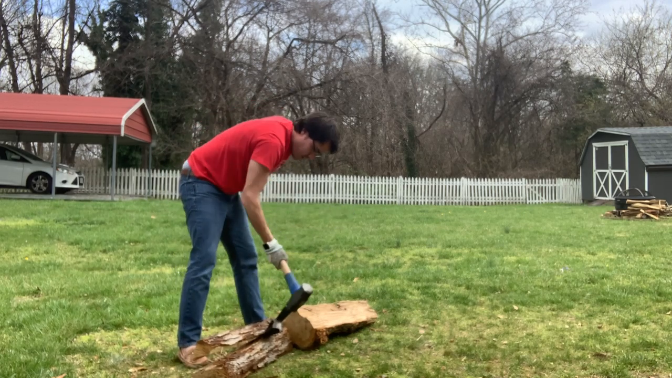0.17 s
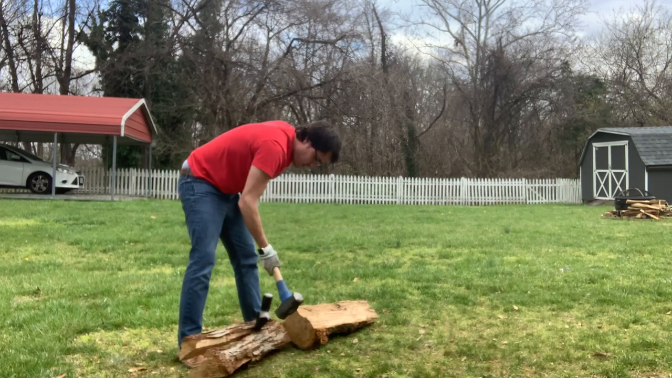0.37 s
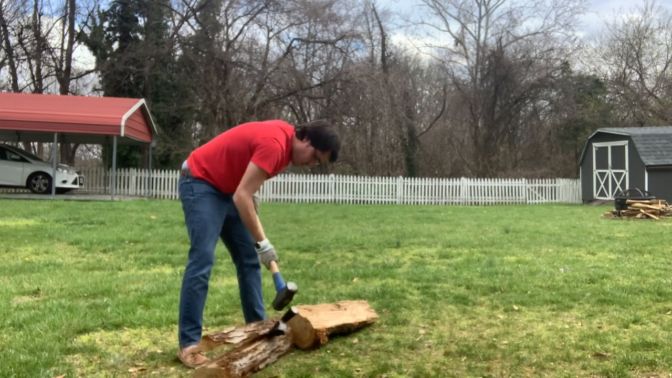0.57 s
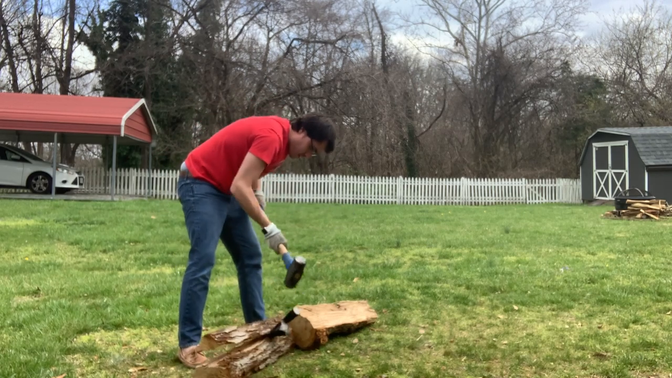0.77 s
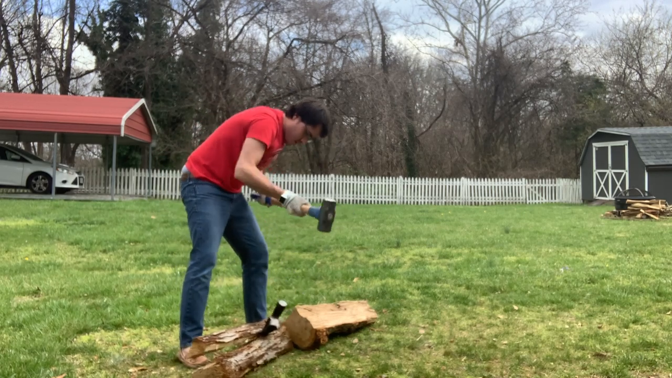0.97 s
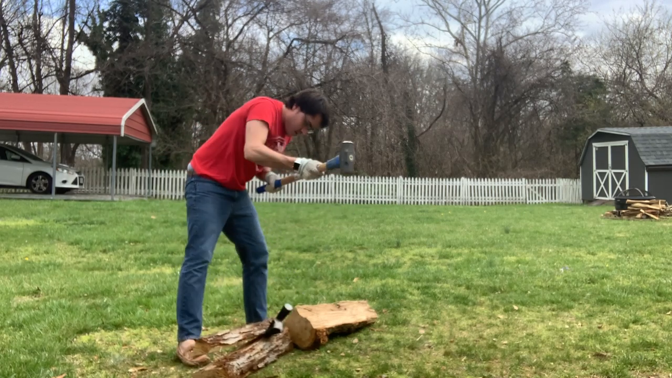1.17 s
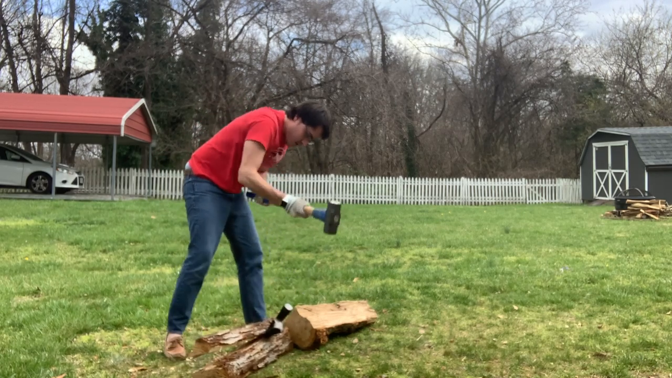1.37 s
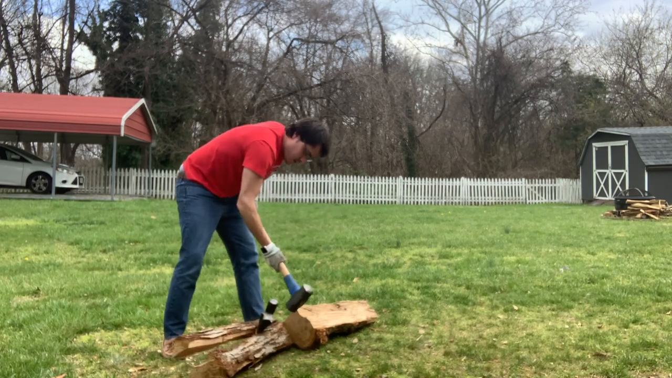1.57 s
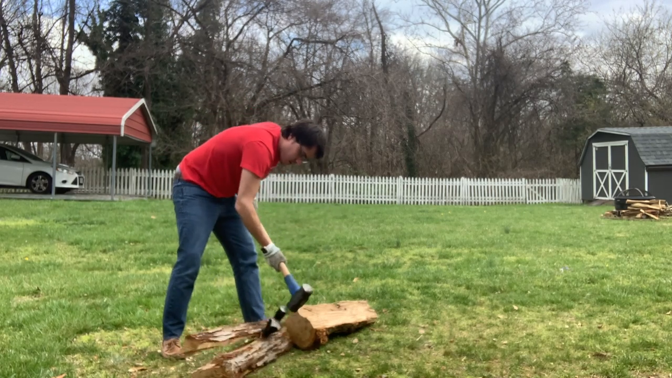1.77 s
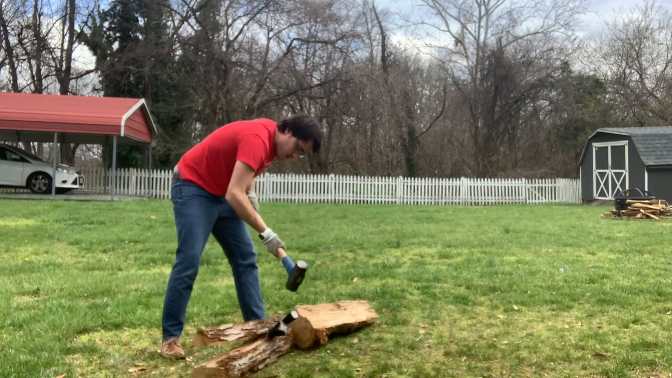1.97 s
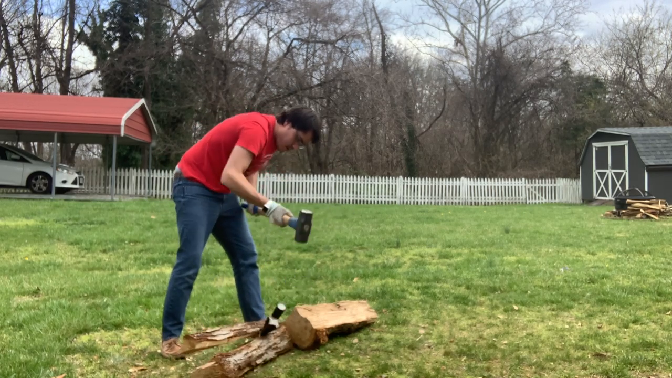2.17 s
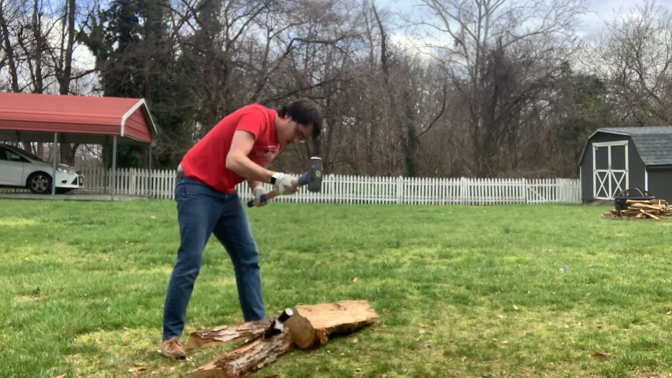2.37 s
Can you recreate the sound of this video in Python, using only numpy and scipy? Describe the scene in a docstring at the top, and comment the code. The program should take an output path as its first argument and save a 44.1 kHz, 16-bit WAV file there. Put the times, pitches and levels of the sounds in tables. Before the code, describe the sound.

A sledgehammer hits a steel wedge in a log twice, just over a second apart, each a sharp chattering clank with wood crack, then a dull head knock; open lawn, light wind rumble, stereo microphone some distance away.

```python
"""On an open lawn in light wind, a sledgehammer twice hits a steel wedge set in a log.
Each blow is a short chatter: dying tones for the wedge, the steel and the log, and noise bursts for cracking wood.
A soft swish comes before the second blow. After each blow the head drops onto the log; low tones thump the turf.
Fading noise makes the answers of lawn, yard, buildings and trees; filtered noise makes wind and a distant hush."""
import sys
import numpy as np
from scipy import signal
from scipy.fft import rfft, irfft
from scipy.io import wavfile

SR = 44100
rng = np.random.default_rng(int(sys.argv[2]) if len(sys.argv) > 2 else 0)


def digitize_waveform(pressure):
    """Quantize a signal to 16-bit integers and store it at the path in sys.argv[1].

    Rows of a 2-D input are taken as channels; values are limited to [-1, 1].
    """
    field = np.atleast_2d(pressure).T
    bounded = np.clip(field, -1, 1)
    quanta = np.round(bounded * 32767).astype(np.int16)
    wavfile.write(sys.argv[1], SR, quanta)


N = 105840  # samples, 2.4 s
T = np.arange(N) / SR  # time in seconds

# Tone of the wind rumble. Each row: pitch in Hz, relative level per Hz in dB.
WIND_TONE = [(20, -18.5), (32, -9), (48, 5), (65, 1), (100, 3.5), (135, -6.5), (180, -12), (260, -19.5),
             (400, -43), (1000, -67.5)]
# Loudness of the wind before its gusts. Each row: time in seconds, level in dB.
WIND_LOUDNESS = [(0, -52), (.1, -55), (.15, -43.5), (.27, -69.5), (.39, -66.5), (.43, -51.5), (.51, -58),
                 (.65, -46), (.72, -55), (.83, -48.5), (1.02, -56), (1.07, -51.5), (1.25, -53),
                 (1.48, -44.5), (1.74, -55.5), (1.8, -46.5), (1.9, -55), (1.98, -49.5), (2.2, -47),
                 (2.4, -50)]
# Tone of the distant hush. Each row: pitch in Hz, relative level per Hz in dB.
HUSH_TONE = [(100, 1.5), (300, 0.5), (600, -6.5), (1200, -8.5), (2100, -10.5), (2380, -8), (2560, 0),
             (2740, -10.5), (4000, -17.5), (6000, -27), (8300, -39.5), (11000, -31), (14000, -47.5),
             (15500, -52)]
# Loudness of the hush. Each row: time in seconds, level in dB.
HUSH_LOUDNESS = [(0, -64), (.4, -63), (.9, -64), (1.3, -64.5), (1.9, -66), (2.4, -69)]
# Near scatter from the lawn. Each row: pitch in Hz, level in dB, seconds to fade by 60 dB.
LAWN_SCATTER = [(150, -7.5, 0.29), (500, -9, 0.08), (1480, -13, 0.1), (3100, -13, 0.19),
                (6000, -9.5, 0.074), (12900, -15, 0.11)]
# Wider scatter from the yard. Each row: pitch in Hz, level in dB, seconds to fade by 60 dB.
YARD_SCATTER = [(150, -21.5, .3), (500, -21.5, 0.41), (1500, -29, 0.22), (3200, -27, 0.19),
                (5500, -29, 0.27), (9500, -31, .25), (14000, -31, 0.22)]
# Brief slap from the buildings. Each row: pitch in Hz, level in dB, seconds to fade by 60 dB.
BUILDING_SLAP = [(507, -45, .12), (3000, -32.5, 0.14), (7300, -33, 0.06), (9760, -24, 0.12),
                 (13000, -37, 0.07)]
# Echo of the tree line. Each row: pitch in Hz, level in dB, seconds to fade by 60 dB.
TREE_ECHO = [(152.9, -41, 0.5), (497, -35.5, 1), (1070, -25, 0.73), (1600, -29, 1), (2256, -23, 0.45),
             (3150, -28, 0.73), (4070, -27, 0.6), (5370, -26.5, 0.82), (9100, -34, 0.6), (11600, -36, 0.19),
             (14100, -42.5, .25)]
# Tone of the hammer's swish. Each row: pitch in Hz, relative level in dB.
SWISH_TONE = [(150, -18.5), (470, 1), (700, -11.5), (1200, -13.5), (2500, -29.5), (8000, -47.5)]
# The head lightly brushes the wedge. Each row: start in seconds, level in dB, decay time in seconds,
# tilt in dB per octave.
LIGHT_TICKS = [(1.83, -59, 0.0088, 1.5)]
# The log thumps the ground. Each row: start in seconds, level in dB, pitch in Hz, seconds to fade by 60 dB.
GROUND_THUMPS = [(0.2096, -35, 114, 0.11), (0.21, -40.5, 255, 0.047), (1.5143, -28, 137, 0.071),
                 (1.514, -29.5, 238.7, 0.032), (1.5172, -28, 67.15, 0.1), (1.8338, -29, 159.5, 0.034)]
# The head drops onto the log and bounces. Each row: start in seconds, blow index, level in dB,
# most excited pitch in Hz.
HEAD_KNOCKS = [(0.5283, 0, -31.5, 2420), (0.5325, 0, -37.5, 420), (0.5368, 0, -47, 1410),
               (0.5398, 0, -44, 527), (1.8315, 1, -48.5, 420)]
# Bark crushed under the head. Each row: start in seconds, level in dB, decay time in seconds,
# tilt in dB per octave.
BARK_CRUNCHES = [(0.528, -43, 0.013, 8.5), (1.829, -49, 0.011, -9.5)]
# Tones of the log, split further by the second blow. Each row: pitch in Hz, seconds to fade by 60 dB,
# relative level in dB after the first blow, the same after the second.
LOG_TONES = [(403, 0.064, -1.5, -9), (466, 0.048, -17, -1), (546.2, .055, 1.5, -6), (751, 0.071, -1, -14),
             (841, .055, -3, -8.5), (1270, .045, 0.5, -11.5), (1420, 0.039, -7.5, -4.5),
             (1500, 0.014, -2, -12.5), (1600, 0.035, -1.5, -12), (2145, 0.023, -6, -20.5),
             (2240, 0.029, -2.5, -16.5)]
# Tone of splitting wood before any tilt. Each row: pitch in Hz, relative level in dB.
CRACK_TONE = [(60, -11), (150, -8.5), (400, -2), (750, -1), (1000, -4), (2000, 1), (2600, 0.5), (3200, 3.5),
              (3900, 0.5), (5000, 1.5), (6000, -4), (7300, -3), (8300, -33.5), (9800, -9), (13200, -7),
              (14300, -28.5)]
# Thin ring of the steel. Each row: pitch in Hz, seconds to fade by 60 dB,
# level in dB at the first blow, level in dB at the second.
STEEL_TONES = [(5130, .13, -31, -43), (6197, .14, -45, -38), (7070, .08, -43, -38), (9790, .2, -42, -41),
               (9865, .18, -42, -39), (9960, .14, -46, -42), (11320, .2, -47, -58), (12930, .15, -46, -41),
               (13160, .13, -44, -47), (13870, .13, -41, -32), (13910, .24, -39, -40)]
# Tones of the wedge in the wood; it sits deeper at the second blow. Each row: pitch in Hz,
# seconds to fade by 60 dB, relative level in dB at the first blow, the same at the second.
WEDGE_TONES = [(1057, 0.07, -39, -26), (1179, .065, -26, -27.5), (1278, .05, -21, -36.5),
               (1661, .05, -39, -20), (1702, .04, -20.5, -25.5), (1774, 0.048, -19.5, -37),
               (2172, 0.1, -36, -30.5), (2250, 0.089, -27, -25), (2389, 0.037, -29.5, -27.5),
               (2434, .04, -23.5, -25.5), (2594, 0.13, -25.5, -31), (2664, .05, -29.5, -26),
               (2943, 0.05, -13.5, -28.5), (3050, 0.05, -15, -28.5), (3110, 0.065, -30, -20.5),
               (3227, 0.055, -20, -25), (3497, 0.1, -27, -28.5), (3516, 0.03, -34, -24),
               (3727, 0.098, -37, -30), (4248, .03, -32, -22), (4360, 0.034, -36.5, -26),
               (4800, .02, -15.5, -26.5)]
# Head meets wedge. Each row: start in seconds, blow index, relative crack level in dB, relative clank
# level in dB, crack tilt in dB per octave, crack decay time in seconds, most excited pitch in Hz.
STEEL_CONTACTS = [(0.2073, 0, 1, 1.5, 0, 0.0068, 1600), (0.2125, 0, -8, -14.5, 8.5, 0.0022, 5000),
                  (0.216, 0, -4.5, 0.5, -1, 0.004, 3100), (1.5118, 1, 2, 1.5, -0.5, 0.0045, 3700),
                  (1.5202, 1, -2.5, -5.5, -3.5, 0.0036, 1712), (1.5248, 1, -2.5, -3, -2, 0.0068, 3300)]
# The log answers and the steel rings. Each row: start in seconds, blow index, relative log level in dB,
# most excited log pitch in Hz.
BLOW_ANSWERS = [(0.2084, 0, -29, 847), (1.5127, 1, -26, 586)]

# Likeness: share of noise power common to left and right.
WIND_LIKENESS, HUSH_LIKENESS, SWISH_LIKENESS = 0.47, 0.03, 0.27
GUST_DB, GUST_S = 3, 0.042  # typical swing and pace of the lumps in the wind
LAWN_START_S, LAWN_RISE_S = 0.004, 0.0097
YARD_START_S, YARD_RISE_S = 0.037, 0.013
SLAP_START_S, SLAP_RISE_S = 0.1065, 0.013
TREES_START_S, TREES_RISE_S = 0.13, 0.06
SWING_S, SWING_WIDTH_S, SWING_DB = 1.34, 0.022, -58
THUMP_RISE_S, STEEL_RISE_S, CLANK_RISE_S = 0.0042, 0.00036, 0.00095
KNOCK_TOP_HZ = 3230
CRACK_DB, CRACK_RISE_S = -16.5, 0.0006
CRACK_SPREAD = 0.25  # share of crack noise that differs between left and right
GRAIN_DB, GRAIN_S = 8, 0.0022  # greatest swing and pace of the clumps in a crack, before levelling
PIVOT_HZ = 3000  # a tilt leaves this pitch unchanged
RATTLE, RATTLE_S = 0.34, 0.005  # depth and pace of the flutter
FOCUS_DB, FOCUS_OCTAVES = 10.5, 0.38  # depth and width of the favoured pitch range
# Bending waves are slow in the bass, so it leaves the log late.
BASS_LAG_S, BASS_LAG_HZ = 0.004, 720
RIGHT_LAG_S = 0.000068
BASS_CUT_HZ, CUTOFF_HZ = 42, 14700


def amp(db):
    """Turns decibels into gain."""
    return 10 ** (np.asarray(db) / 20)


def unit(x):
    """Scales a sound to an average strength (rms) of 1."""
    return x / np.sqrt(np.mean(x ** 2) + 1e-20)


def read(points, hz, axis=1):
    """Reads a table column between its rows, along a logarithmic pitch axis."""
    table = np.array(points, float)
    return np.interp(np.log(hz + 1), np.log(table[:, 0] + 1), table[:, axis])


def add(mix, s, sound):
    """Mixes a sound in at time s, cutting off what runs past the end."""
    part = mix[..., round(s * SR):][..., :sound.shape[-1]]
    part += sound[..., :part.shape[-1]]


def colour(x, points, tilt_db=0, size=8192):
    """Shapes the tone by a table and a tilt per octave, with a filter of unit energy and no pre-echo."""
    hz = abs(np.fft.fftfreq(size, 1 / SR))
    octaves = np.log2(np.maximum(hz, 300) / PIVOT_HZ)  # the tilt is flat below 300 Hz
    log_gain = np.log(amp(read(points, hz) + tilt_db * octaves))
    # The phase that goes with this gain packs the filter's energy at its start.
    spectrum = np.exp(np.conj(signal.hilbert(log_gain)))
    taps = np.fft.ifft(spectrum).real[:size // 2]
    taps = taps / np.linalg.norm(taps)
    return signal.fftconvolve(x, taps[None], axes=1)[:, :x.shape[1]]


def pair(likeness, size):
    """Makes two channels of partly shared white noise."""
    shared = np.clip(likeness, 0, 1)
    noise = rng.standard_normal((3, size))
    return np.sqrt(shared) * noise[0] + np.sqrt(1 - shared) * noise[1:]


def wander(width_s, size):
    """Smooths noise with a bell-shaped window into slow random motion of rms 1."""
    t = T[:size]
    bell = np.exp(-((t - t.mean()) / width_s) ** 2)
    return unit(signal.fftconvolve(rng.standard_normal(size), bell, "same"))


def swell(rise_s):
    """Builds up quickly to full strength."""
    return 1 - np.exp(-T[:SR // 2] / rise_s)


def mode(hz, t60):
    """One vibration of a solid body: a sine that dies away by 60 dB in t60 seconds."""
    t = T[:SR // 2]
    return np.sin(2 * np.pi * hz * t) * np.exp(-np.log(1000) * t / t60)


def flutter():
    """An uneven loudness, as the wedge rattles in the wood."""
    return (1 + RATTLE * wander(RATTLE_S, SR // 2)) / np.hypot(1, RATTLE)


def focus(hz, centre_hz):
    """Weakens, in dB, the modes away from the pitch that a contact favours."""
    if centre_hz is None:
        return 0
    distance = np.log2(hz / centre_hz) / FOCUS_OCTAVES
    return FOCUS_DB * (np.exp(-0.5 * distance ** 2) - 1)


def ring(modes, blow, centre_hz=None):
    """A struck body: the sum of its fluttering modes, strongest near the favoured pitch if one is given."""
    out = 0
    for hz, t60, *db in modes:
        out = out + amp(db[blow] + focus(hz, centre_hz)) * mode(hz, t60) * flutter()
    return out


def crack(decay_s, tilt_db):
    """Tearing wood fibres: a dying burst of noise in uneven clumps."""
    t = T[:SR // 5]
    clumps = unit(amp(GRAIN_DB * np.tanh(wander(GRAIN_S, len(t)))))
    envelope = (1 - np.exp(-t / CRACK_RISE_S)) * np.exp(-t / decay_s)
    return colour(pair(1 - CRACK_SPREAD, len(t)) * clumps * envelope, CRACK_TONE, tilt_db)


def wind():
    """Wind on the microphone: a low noise rumble with random lumps."""
    # One extra second lets the filter settle before the sound begins.
    rumble = colour(pair(WIND_LIKENESS, N + SR), WIND_TONE)[:, SR:]
    lumpy = unit(rumble * amp(GUST_DB * wander(GUST_S, N)))
    return lumpy * amp(np.interp(T, *np.transpose(WIND_LOUDNESS)))


def hush():
    """The smooth distant hush: steady noise under a slowly changing level."""
    smooth = unit(colour(pair(HUSH_LIKENESS, N + SR), HUSH_TONE)[:, SR:])
    return smooth * amp(np.interp(T, *np.transpose(HUSH_LOUDNESS)))


def reflect(x, bands, start_s, rise_s):
    """Scattered reflections: the sound is smeared by noise that swells, then dies at each pitch's own speed."""
    taps = rng.standard_normal((2, SR))
    hz, t, z = signal.stft(taps, SR, nperseg=256)
    t60 = read(bands, hz, axis=2)[:, None]
    fade = np.exp(-np.log(1000) * np.maximum(t - start_s - rise_s, 0) / t60)
    shape = np.sqrt(np.clip((t - start_s) / rise_s, 0, 1)) * fade
    # Level each pitch by its total energy, so that the table alone sets its strength.
    energy = SR * np.mean(shape ** 2, axis=1, keepdims=True)
    shape *= amp(read(bands, hz))[:, None] / np.sqrt(energy + 1e-20)
    scatter = signal.istft(z * shape, SR, nperseg=256)[1]
    return signal.fftconvolve(x, scatter, axes=1)[:, :N]


def swing():
    """The hammer comes down through the air: a soft swish of noise that swells and fades."""
    bell = np.exp(-0.5 * ((T - SWING_S) / SWING_WIDTH_S) ** 2)
    return amp(SWING_DB) * colour(pair(SWISH_LIKENESS, N), SWISH_TONE) * bell


def ticks():
    """A light touch of the head on the wedge: a faint noise burst."""
    out = np.zeros((2, N))
    for s, level_db, decay_s, tilt_db in LIGHT_TICKS:
        add(out, s, amp(level_db) * crack(decay_s, tilt_db))
    return out


def thumps():
    """The log is pushed into the turf: low tones that build up softly and die fast."""
    out = np.zeros((2, N))
    for s, level_db, hz, t60 in GROUND_THUMPS:
        add(out, s, amp(level_db) * swell(THUMP_RISE_S) * mode(hz, t60))
    return out


def knocks():
    """The head bounces on the log, which rings as the bark crunches; soft bark dulls the treble."""
    out = np.zeros((2, N))
    for s, blow, level_db, centre_hz in HEAD_KNOCKS:
        add(out, s, amp(level_db) * swell(CLANK_RISE_S) * ring(LOG_TONES, round(blow), centre_hz))
    for s, level_db, decay_s, tilt_db in BARK_CRUNCHES:
        add(out, s, amp(level_db) * crack(decay_s, tilt_db))
    dull = signal.butter(N=4, Wn=KNOCK_TOP_HZ, fs=SR, output="sos")
    return signal.sosfilt(dull, out)


def blows():
    """Each contact clanks the wedge and cracks the wood; the log answers and the steel rings on."""
    out = np.zeros((2, N))
    for s, blow, crack_db, clank_db, tilt_db, decay_s, centre_hz in STEEL_CONTACTS:
        add(out, s, amp(CRACK_DB + crack_db) * crack(decay_s, tilt_db))
        clank = swell(CLANK_RISE_S) * ring(WEDGE_TONES, round(blow), centre_hz)
        add(out, s, amp(clank_db) * clank)
    for s, blow, log_db, centre_hz in BLOW_ANSWERS:
        steel = swell(STEEL_RISE_S) * ring(STEEL_TONES, round(blow))
        log = amp(log_db) * ring(LOG_TONES, round(blow), centre_hz)
        add(out, s, steel + log)
    return out


def disperse(x):
    """Delays the bass, so that each hit sweeps downward for a few milliseconds."""
    turns = BASS_LAG_S * BASS_LAG_HZ * np.arctan(np.fft.rfftfreq(N, 1 / SR) / BASS_LAG_HZ)
    return irfft(rfft(x) * np.exp(-2j * np.pi * turns), N)


def scene():
    """The direct sound reaches the left side first; the lawn, the yard, the buildings and the trees answer."""
    dry = disperse(blows() + knocks()) + thumps() + ticks()
    lag = np.exp(-2j * np.pi * np.fft.rfftfreq(N, 1 / SR) * RIGHT_LAG_S)
    direct = np.array([dry[0], irfft(rfft(dry[1]) * lag, N)])
    lawn = reflect(dry, LAWN_SCATTER, LAWN_START_S, LAWN_RISE_S)
    yard = reflect(dry, YARD_SCATTER, YARD_START_S, YARD_RISE_S)
    buildings = reflect(dry, BUILDING_SLAP, SLAP_START_S, SLAP_RISE_S)
    trees = reflect(dry, TREE_ECHO, TREES_START_S, TREES_RISE_S)
    return direct + lawn + yard + buildings + trees + swing() + wind() + hush()


def record(dry):
    """Cuts the deepest bass and the highest treble of the whole sound."""
    bass_cut = signal.butter(N=3, Wn=BASS_CUT_HZ, btype="high", fs=SR, output="sos")
    treble_cut = signal.firwin(101, CUTOFF_HZ, window=("kaiser", 8), fs=SR)
    dry = signal.sosfilt(bass_cut, dry)
    return signal.oaconvolve(dry, treble_cut[None], "same")


dry = scene()
out = record(dry)
digitize_waveform(out)
```